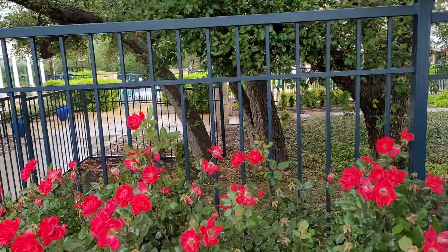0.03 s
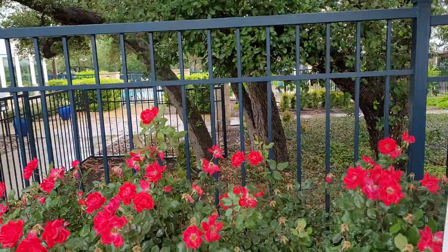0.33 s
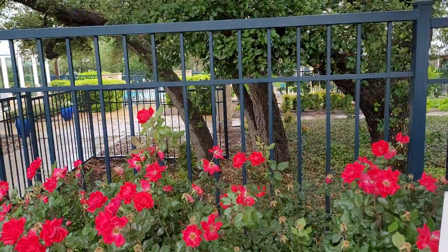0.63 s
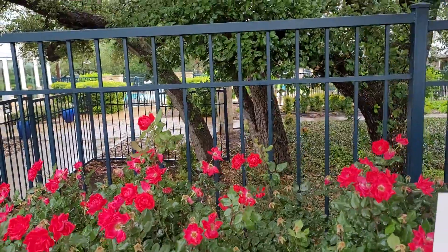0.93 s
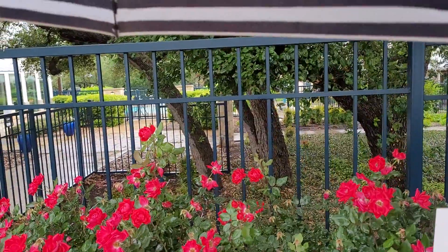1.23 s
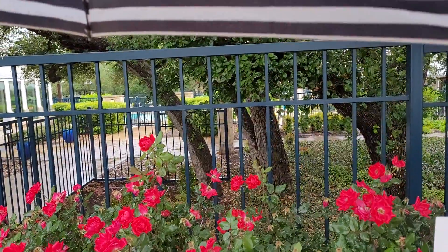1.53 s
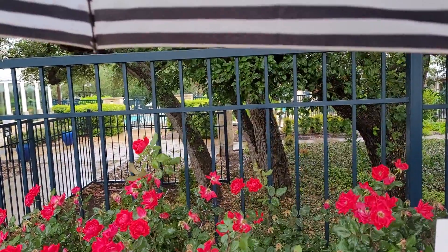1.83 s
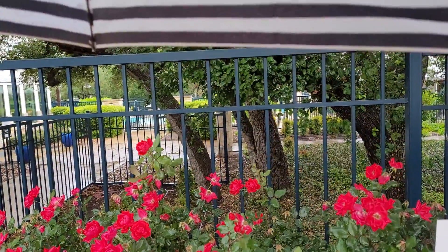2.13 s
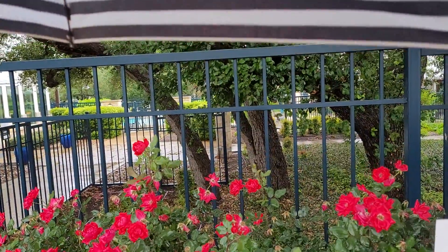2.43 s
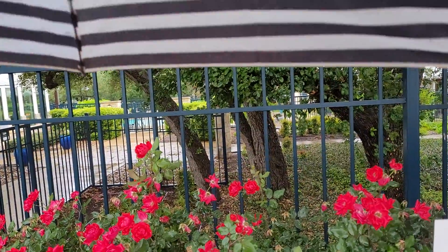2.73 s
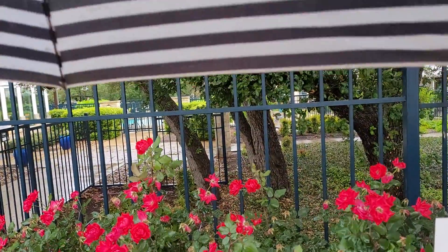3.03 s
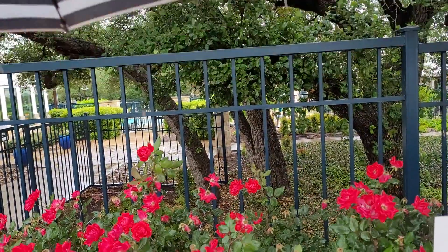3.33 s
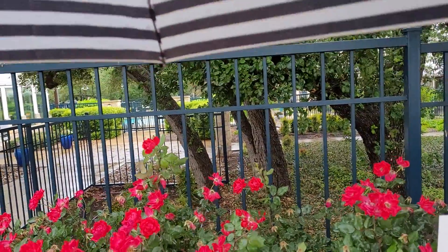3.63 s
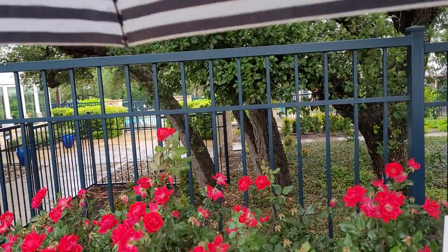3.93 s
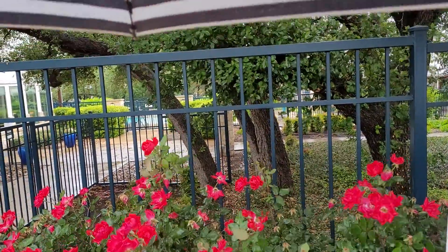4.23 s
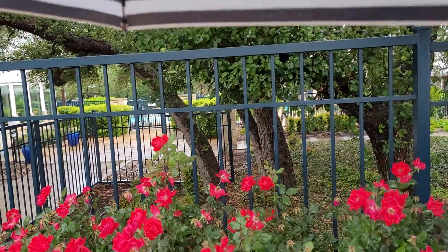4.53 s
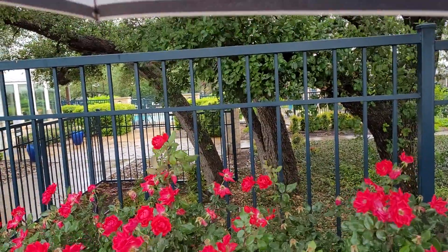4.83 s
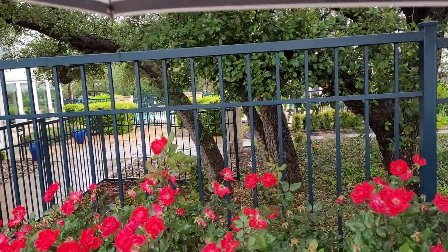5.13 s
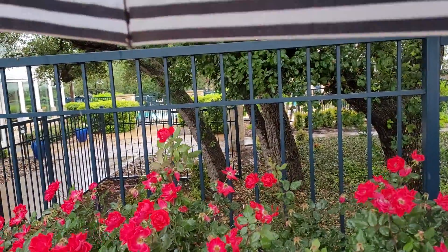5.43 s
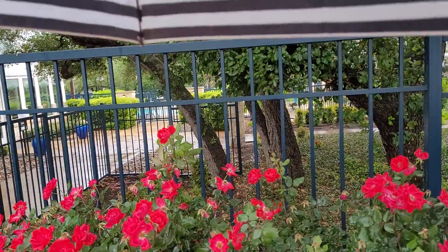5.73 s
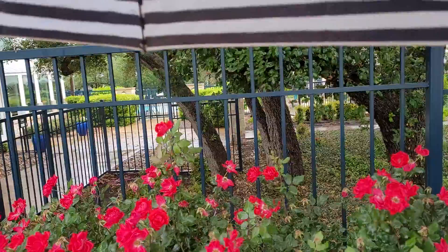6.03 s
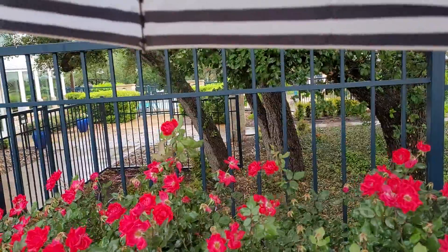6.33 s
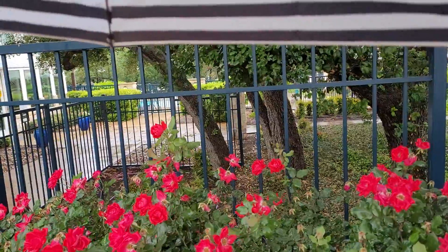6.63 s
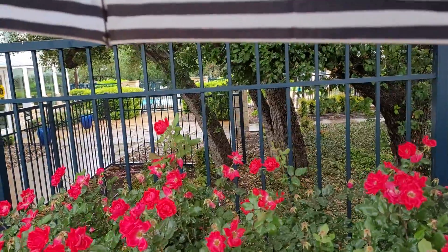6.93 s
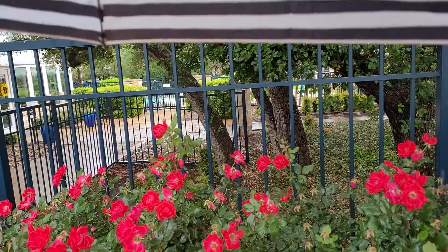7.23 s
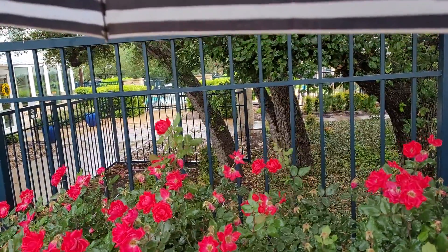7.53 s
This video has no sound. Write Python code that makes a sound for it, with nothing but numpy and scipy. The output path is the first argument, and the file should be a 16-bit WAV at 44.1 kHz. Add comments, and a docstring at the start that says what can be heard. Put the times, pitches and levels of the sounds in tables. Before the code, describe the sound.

Light rain falls on an umbrella just above the microphone in a garden. Separate drops tick and thump on the taut cloth, sparse at first, then quicker through the middle before thinning out. Gusts of wind rumble and flutter on the microphone, strongest a little past halfway, then calm down. Behind this lie a soft hiss of rain on leaves and a faint, distant town hum.

```python
"""Light rain on a garden umbrella.

Drops tick and thump on the taut cloth just overhead. Gusts reach two microphone ports, each with its
own rumble and flutter, and shake droplets onto the cloth. A hollow rush swells and fades early on.
Behind it all: the soft hiss of rain on leaves, fine spray and the far murmur of the town."""
import sys
import numpy as np
from scipy import signal
from scipy.fft import rfft, irfft, next_fast_len
from scipy.io import wavfile
from scipy.ndimage import uniform_filter1d

SR = 44100
rng = np.random.default_rng(int(sys.argv[2]) if len(sys.argv) > 2 else 0)


def wav_record(signal):
    """Record a signal, one row per channel, as 16-bit PCM in the file named by sys.argv[1]."""
    frames = np.transpose(np.atleast_2d(signal))
    bounded = np.clip(frames, -1, 1)
    # unit amplitude maps onto the largest positive 16-bit level
    quanta = np.round(bounded * 32767).astype(np.int16)
    wavfile.write(sys.argv[1], SR, quanta)


N = 333837

# start_s, tick_db, tick_hz, thump_db
DROP_HITS = [(0.839, -25, 2750, -47), (1.031, -25.5, 1400, -43), (1.564, -25.5, 1290, -26),
             (2.1912, -30, 2420, -40), (2.8207, -28.5, 1180, -42), (2.878, -35, 1090, -24),
             (2.947, -32, 1700, -15), (3.083, -26, 2200, -39), (3.1513, -28, 4050, -42),
             (3.3988, -22.5, 3760, -48), (3.426, -22.5, 3280, -26), (3.7731, -22.5, 3540, -26.5),
             (3.8033, -21, 1980, -31.5), (3.8346, -27, 2020, -30.5), (3.9124, -25, 1390, -23),
             (3.932, -24.5, 2320, -39), (4.044, -22.5, 2200, -23), (4.0849, -24.5, 1890, -25),
             (4.182, -25, 4000, -42), (4.1999, -25, 2200, -22.5), (4.2253, -28.5, 1600, -24),
             (4.4425, -24.5, 1710, -22), (4.555, -20.5, 1670, -18.5), (4.6571, -29, 1980, -22),
             (4.767, -30.5, 1000, -27), (4.8727, -27, 4000, -47), (4.957, -22.5, 2530, -22),
             (5.054, -17, 1720, -13.5), (5.0986, -33.5, 3700, -50), (5.253, -25.5, 1300, -39),
             (5.338, -25.5, 1950, -23), (5.445, -21.5, 2530, -17), (5.4877, -28, 2850, -26),
             (5.79, -36, 3000, -41), (5.9227, -23, 4040, -22.5), (5.952, -39, 1200, -29),
             (5.994, -31, 4060, -29), (6.335, -32.5, 2850, -47), (6.4538, -21.5, 2680, -36.5),
             (6.4569, -27.5, 2620, -26), (7.017, -30, 2800, -39), (7.197, -26, 2200, -19)]
# taut, damp cloth: pitch_hz, level_db, t60_s
CLOTH_MODES = [(302, 5, 0.06), (435, 15.5, 0.015), (705, 3.5, 0.033)]
def drops(splash_db=-30, splash_s=0.015, rebound_db=-9, samples=3000):
    """A drop snaps on the cloth, splashes and thumps the panel; taut spots ring higher than slack."""
    out, t = np.zeros((2, N)), np.arange(samples) / SR
    flatten_s, blow_s, pan_db, pieces_per_s, usual_tick_hz = .0005, .0005, 4, 250, 2200
    highpass = signal.butter(1, 400, "high", fs=SR)
    for start_s, tick_db, tick_hz, thump_db in DROP_HITS:
        crackle, spray = rng.standard_normal((2, 2, samples))
        splash_decay = np.exp(-t / splash_s)
        slap = (t == 0) + t / flatten_s * np.exp(-t / flatten_s) * crackle
        slap += amp(splash_db) * splash_decay * spray
        # pieces of the drop land again
        pieces = (rng.random(samples) < pieces_per_s / SR) * rng.standard_normal(samples) * splash_decay
        slap += amp(rebound_db) * signal.fftconvolve(slap, pieces[None])[:, :samples]
        tick = signal.lfilter(*highpass, colour(slap, spot_spectrum(tick_hz)))
        detune = np.sqrt(tick_hz / usual_tick_hz) * np.exp(.12 * rng.standard_normal(len(CLOTH_MODES)))
        thump = sum(amp(mode_db - 60 * t / t60_s) * np.sin(2 * np.pi * hz * ratio * t)
                    for (hz, mode_db, t60_s), ratio in zip(CLOTH_MODES, detune))
        drop = amp(tick_db) * evened(tick) + amp(thump_db) * evened(thump)
        drop *= np.sqrt(blow_s * SR / samples)  # energy of those levels held for blow_s
        add(out, start_s, drop * port_gains(rng.uniform(-pan_db, pan_db))[:, None])
    return out


# freq_hz, gain_db
TICK_SPECTRUM = [(300, 18.5), (850, 22), (1300, 11.5), (2100, 10.5), (4000, 0), (5500, -4.5), (7800, -2),
                 (9500, -13), (12500, -2), (16000, -13.5)]
def spot_spectrum(tick_hz, peak_db=5, width_octaves=.6, ripple_db=1.6):
    """One spot on the cloth colours its tick with a broad resonance and chance ripples."""
    hz = np.geomspace(250, 16000, 28)
    resonance_db = peak_db * np.exp(-(np.log2(hz / tick_hz) / width_octaves) ** 2)
    gain_db = value_at(TICK_SPECTRUM, hz) + resonance_db + ripple_db * rng.standard_normal(len(hz))
    return np.transpose([hz, gain_db])


# start_s, length_s, level_db
DROPLET_SHOWERS = [(0.75, 0.12, -47), (3.069, 0.078, -44.5), (3.296, 0.026, -46), (3.373, 0.093, -46.5),
                   (4.924, 0.064, -45), (5.04, 0.019, -39.5)]
def droplets(rumble_gain, calm_db=-47, patter_db=-53, boost_db=7, spots=8):
    """Fine drops tick on the cloth: in brief showers, as patter in gusts, as drizzle with the spray."""
    t, shower_gain = np.arange(N) / SR, np.zeros(N)
    *_, fizz_db = curves(BACKGROUND_LEVELS)
    for start_s, length_s, level_db in DROPLET_SHOWERS:
        progress = np.clip((t - start_s) / length_s, 0, 1)
        shower_gain += amp(level_db) * np.sqrt(abs(np.sin(np.pi * progress)))
    shower = shower_gain * impacts(per_s=380, spread_db=3)
    shaken = rumble_gain / (rumble_gain + amp(calm_db))
    clumps = evened(amp(3 * np.minimum(wander(rate_hz=60, channels=1), 1.5)))
    patter = impacts(per_s=30, spread_db=2.2) * clumps * shaken * amp(patter_db)
    drizzle = impacts(per_s=17, spread_db=1.8) * clumps * amp(fizz_db)
    hits = shower + patter + drizzle
    struck_spot = rng.integers(spots, size=N)
    ticks = sum(colour(hits * (struck_spot == spot), spot_spectrum(hz), size=1024)
                for spot, hz in enumerate(np.geomspace(2000, 5500, spots)))
    highpass = signal.butter(1, 3500, "high", fs=SR)  # small drops are brighter
    ticks = amp(boost_db) * signal.lfilter(*highpass, ticks)
    at_far_port = np.roll(ticks[::-1], SR // 3000, 1)
    return ticks + .45 * at_far_port


# start_s, length_s, rumble_db, flutter_db, slant (0 head-on, 1 across the ports)
WIND_GUSTS = [(0.155, 0.81, -47, -41, 0.98), (0.49, 0.064, -37, -32.5, 0.65),
              (1.027, 0.11, -40.5, -44, 0.64), (1.364, 0.21, -41, -47.5, 0.9),
              (2.106, 0.088, -41, -49, 0.51), (2.25, 0.17, -51, -43, 0.83),
              (2.386, 0.23, -36.5, -36.5, 0.68), (2.74, 0.44, -45.5, -41.5, 0.96),
              (2.914, 0.26, -32, -32, 0.49), (3, 0.084, -34, -54, 0.89), (3.162, 0.27, -36, -36.5, 0.012),
              (3.45, 0.074, -30, -28, 0.065), (3.575, 0.11, -35, -34.5, 0.024),
              (3.858, 0.31, -46.5, -48, 0.083), (4.592, 0.174, -43.5, -47, 0.6),
              (4.799, 0.04, -28.5, -27.5, 0.69), (4.902, 0.088, -24.5, -23.5, 0.4),
              (4.983, 0.3, -49, -39.5, 1), (5.28, 0.21, -42, -45.5, 0.1), (5.58, 0.23, -50, -56.5, 0.17)]
def airflow(breeze_rumble_db=-62, breeze_flutter_db=-58.5, breeze_slant=.15):
    """Gusts build, hold and die away, adding in power over a light breeze."""
    t = np.arange(N) / SR
    rise_share, release_s = .38, .042
    rumble_power = np.full(N, amp(breeze_rumble_db) ** 2)
    flutter_power = np.full(N, amp(breeze_flutter_db) ** 2)
    slanted_power = breeze_slant * (rumble_power + flutter_power)
    for start_s, length_s, rumble_db, flutter_db, slant in WIND_GUSTS:
        rise = np.clip((t - start_s) / (rise_share * length_s) + .5, 0, 1)
        envelope = rise * np.exp(-np.maximum(t - start_s - length_s, 0) / release_s)
        gust_rumble, gust_flutter = (envelope * amp(rumble_db)) ** 2, (envelope * amp(flutter_db)) ** 2
        rumble_power += gust_rumble
        flutter_power += gust_flutter
        slanted_power += slant * (gust_rumble + gust_flutter)
    return np.sqrt(rumble_power), np.sqrt(flutter_power), slanted_power / (rumble_power + flutter_power)


# freq_hz, gain_db
RUMBLE_SPECTRUM = [(35, -20.5), (55, -2), (80, -9), (135, -13.5), (220, -17), (1200, -72.5)]
# freq_hz, gain_db
LOW_FLUTTER_SPECTRUM = [(165, -31.5), (255, -2.5), (360, 0), (520, -9.5), (800, -22), (1500, -65),
                        (8000, -83)]
# freq_hz, gain_db
HIGH_FLUTTER_SPECTRUM = [(150, -43), (300, 3), (480, 2), (800, -9), (1200, -14), (8000, -53)]
def wind(rumble_gain, flutter_gain, slant, rumble_trim_db=1.5):
    """Turbulence at each port: big eddies rumble, small ones flutter in quick bursts."""
    rumble_lr_db, flutter_lr_db = -36, 11.5  # crosswind rumbles right, flutters left
    head_on_db, across_db = -16.5, 8  # high flutter relative to low
    stutter = amp(2.6 * wander(rate_hz=28, channels=1))
    rumble = colour(noise(), RUMBLE_SPECTRUM) * amp(3.3 * wander(rate_hz=30))
    rumble = steadied(rumble * port_gains(rumble_lr_db * slant), window_s=.06)
    bursts = amp(4.7 * wander(rate_hz=85))
    low, high = (bursts * impacts(per_s=1100, spread_db=4) for _ in range(2))
    low = colour(low, LOW_FLUTTER_SPECTRUM) * port_gains(flutter_lr_db * slant ** 4)
    high = colour(high, HIGH_FLUTTER_SPECTRUM) * port_gains(flutter_lr_db * slant)
    high_db = head_on_db + (across_db - head_on_db) * slant
    flutter = steadied(low + amp(high_db) * high, window_s=.045)
    return stutter * (rumble * rumble_gain * amp(rumble_trim_db) + flutter * flutter_gain)


# centre_s, level_db, pitch_hz
STRONG_EDDIES = [(0.275, -26, 450), (0.634, -20.5, 466), (0.834, -25, 66), (0.933, -25, 537),
                 (1.069, -26, 292), (1.146, -23, 192), (1.3, -26.5, 74), (1.448, -24, 337),
                 (2.587, -20, 384), (3.027, -15, 314), (3.138, -15, 215), (3.468, -16, 290),
                 (3.491, -18, 140), (3.532, -22.5, 495), (3.986, -24, 69.6), (4.107, -20.5, 66),
                 (4.826, -9.5, 298), (4.951, -10, 336), (4.983, -12.5, 328)]
def buffets(trim_db=-1, lr_db=-2, lag_s=.0008, width_s=.006):
    """A strong eddy briefly shoves the left port, then the right."""
    out, t = np.zeros((2, N)), np.arange(-SR // 20, SR // 20) / SR
    port_t = t - lag_s * np.array([[0], [1]])
    for centre_s, level_db, pitch_hz in STRONG_EDDIES:
        phase = rng.uniform(-np.pi, np.pi)
        envelope = np.exp(-(port_t / (width_s / 2 + .053 / pitch_hz)) ** 2)
        shove = envelope * np.cos(2 * np.pi * pitch_hz * port_t + phase)
        add(out, centre_s + t[0], amp(level_db + trim_db) * shove * port_gains(lr_db)[:, None])
    return out


# freq_hz, gain_db
HOLLOW_SPECTRUM = [(300, -36), (620, -1), (740, 5), (930, 1.5), (1150, -9), (2500, -58)]
def hollow_rush(level_db=-48, peak_s=.33, width_s=.59):
    """A hollow, grainy rush swells and fades."""
    t = np.arange(N) / SR
    grain = evened(noise() * amp(4.5 * wander(rate_hz=60, channels=1)))
    envelope = np.exp(-.5 * ((t - peak_s) / width_s) ** 2)
    return colour(grain, HOLLOW_SPECTRUM) * amp(level_db) * envelope


# time_s, murmur_db, hiss_db, fizz_db
BACKGROUND_LEVELS = [(0, -58.5, -55.5, -64), (.8, -53.5, -57.5, -65.5), (1.9, -59.5, -60, -67),
                     (2.8, -64.5, -62, -70), (4.3, -57.5, -62.5, -61), (5.1, -59.5, -62, -65.5),
                     (6.25, -58, -63, -65.5), (6.7, -54, -60, -63.5), (7.57, -53, -57, -62.5)]
# far sound at the two ports: freq_hz, coherence
PORT_COHERENCE = [(300, 1), (640, 0.84), (1400, -0.24), (3000, 0.26)]
# freq_hz, gain_db
MURMUR_SPECTRUM = [(25, -27), (58, 1), (140, -1.5), (190, -7), (365, 1), (480, -4.5), (770, -2), (1200, -6),
                   (1850, -5.5), (3000, -22.5), (16000, -68)]
# freq_hz, gain_db
HISS_SPECTRUM = [(500, 3.5), (2000, 10), (4200, 6), (5700, 3), (7800, 5), (9000, -8.5)]
# freq_hz, gain_db
FIZZ_SPECTRUM = [(4000, -17), (9000, -2), (12300, 4), (16000, -4)]
def town_and_far_rain(murmur_trim_db=4.5, hiss_trim_db=3.5):
    """The town murmurs, alike at both ports in the bass; rain hisses on leaves; fine spray fizzes."""
    murmur_db, hiss_db, fizz_db = curves(BACKGROUND_LEVELS)
    size = next_fast_len(N)
    left, unrelated = rfft(noise(), size)
    coherence = value_at(PORT_COHERENCE, np.fft.rfftfreq(size, 1 / SR))
    right = coherence * left + np.sqrt(1 - coherence ** 2) * unrelated
    far_noise = irfft(np.array([left, right]), size)[:, :N]
    swell_db = .7 * wander(rate_hz=12, channels=1)
    murmur = colour(far_noise, MURMUR_SPECTRUM) * amp(murmur_db + murmur_trim_db + swell_db)
    hiss = colour(noise(), HISS_SPECTRUM) * amp(hiss_db + hiss_trim_db + .5 * swell_db)
    fizz = colour(impacts(per_s=1800, spread_db=2.2), FIZZ_SPECTRUM) * amp(fizz_db + swell_db)
    return murmur + hiss + fizz


def noise():
    """White noise, unrelated at the two ports."""
    return rng.standard_normal((2, N))


def impacts(per_s, spread_db):
    """Random clicks at each port, mostly small, a few large."""
    sizes = amp(spread_db * np.minimum(rng.exponential(1, (2, N)), 4))
    return evened(sizes * rng.choice([-1, 1], (2, N)) * (rng.random((2, N)) < per_s / SR))


def wander(rate_hz, channels=2):
    """Slow random motion of rms 1."""
    hz = np.fft.rfftfreq(next_fast_len(N), 1 / SR)
    bins = rng.standard_normal((channels, len(hz), 2)) @ [1, 1j]
    return evened(irfft(bins * np.exp(-(hz / rate_hz) ** 2), next_fast_len(N))[:, :N])


def colour(x, spectrum, size=4096):
    """Unit-energy minimum-phase filter; attacks stay sharp."""
    log_gain = np.log(amp(value_at(spectrum, abs(np.fft.fftfreq(size, 1 / SR)))))
    response = np.fft.ifft(np.exp(np.conj(signal.hilbert(log_gain)))).real[:size // 2]
    return signal.oaconvolve(x, response[None] / np.linalg.norm(response), axes=1)[:, :x.shape[1]]


def value_at(spectrum, hz):
    """Interpolates on a log-frequency axis."""
    freq_hz, values = np.transpose(spectrum)
    return np.interp(np.log(hz + 1), np.log(freq_hz + 1), values)


def curves(rows):
    """Table columns as lines through time."""
    time_s, *columns = np.transpose(rows)
    return [np.interp(np.arange(N) / SR, time_s, column) for column in columns]


def amp(db):
    """Decibels to gain."""
    return 10 ** (np.asarray(db) / 20)


def evened(x):
    """Scales to rms 1."""
    return x / np.sqrt(np.mean(x ** 2) + 1e-20)


def steadied(x, window_s):
    """Holds the running rms near 1; quick bursts pass."""
    power = uniform_filter1d(np.mean(x ** 2, 0), int(window_s * SR))
    return x / np.sqrt(abs(uniform_filter1d(power, int(window_s * SR))) + 1e-12)


def port_gains(lr_db):
    """Constant-power gains for a left-minus-right level."""
    pair = amp(np.array([lr_db / 2, -lr_db / 2]))
    return pair / np.sqrt(np.mean(pair ** 2, 0))


def add(mix, start_s, sound):
    """Mixes a stereo sound in at start_s."""
    part = mix[:, max(round(start_s * SR), 0):][:, :sound.shape[1]]
    part += sound[:, :part.shape[1]]


def scene():
    """Rain and wind under the umbrella."""
    rumble_gain, flutter_gain, slant = airflow()
    background = town_and_far_rain() + hollow_rush()
    gusts = wind(rumble_gain, flutter_gain, slant) + buffets()
    return background + gusts + drops() + droplets(rumble_gain)


def record(dry):
    """Steep low-pass at the top of the treble."""
    cutoff_hz = 16050
    lowpass = signal.firwin(511, cutoff_hz, window=("kaiser", 9), fs=SR)
    return signal.oaconvolve(dry, lowpass[None], "same")


dry = scene()
out = record(dry)
wav_record(out)
```